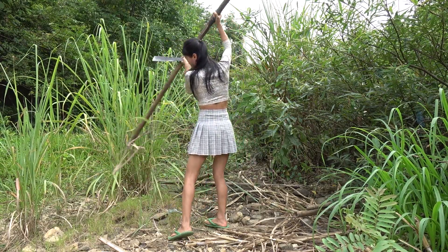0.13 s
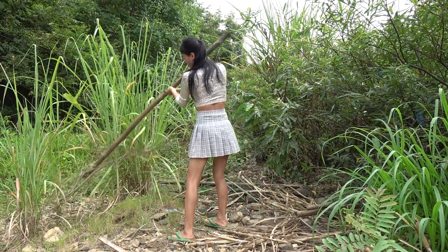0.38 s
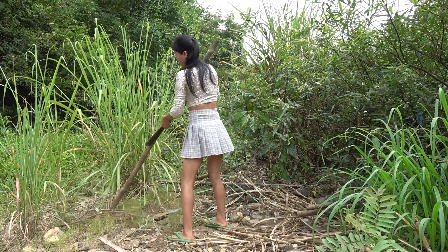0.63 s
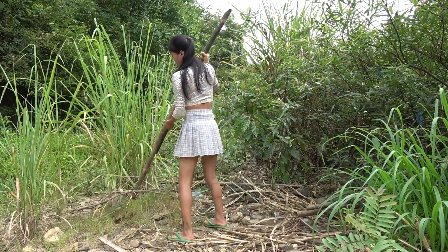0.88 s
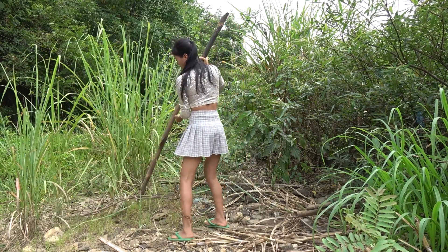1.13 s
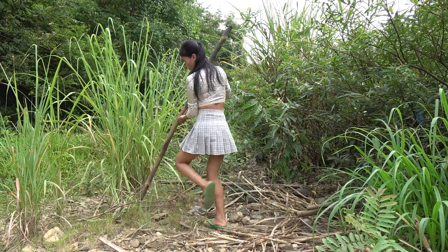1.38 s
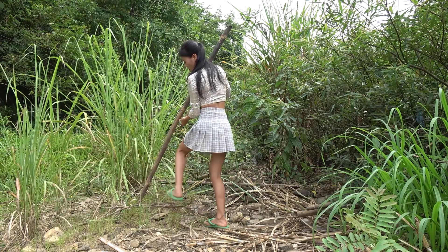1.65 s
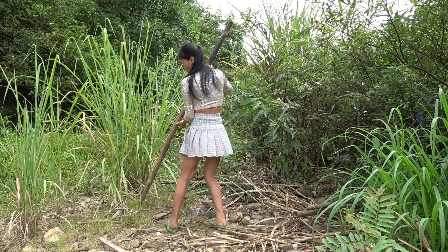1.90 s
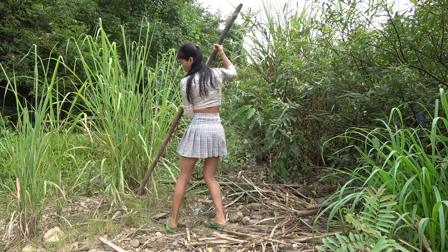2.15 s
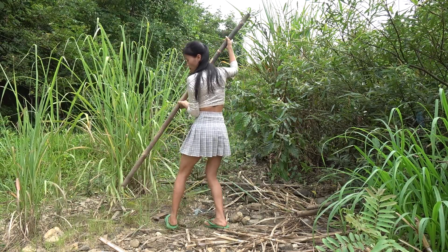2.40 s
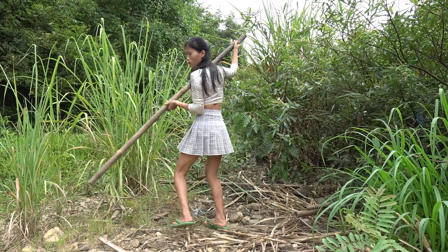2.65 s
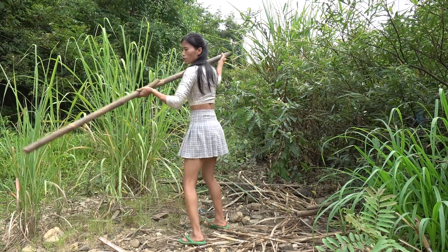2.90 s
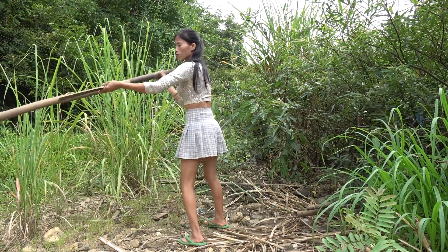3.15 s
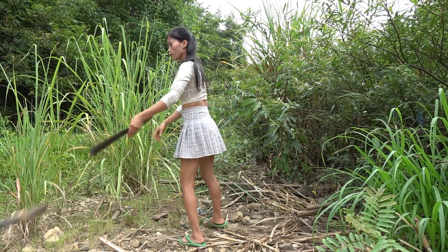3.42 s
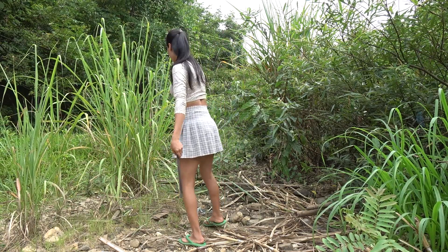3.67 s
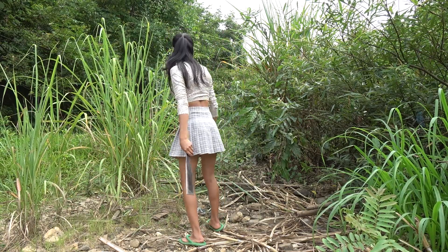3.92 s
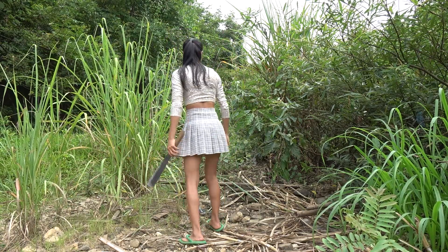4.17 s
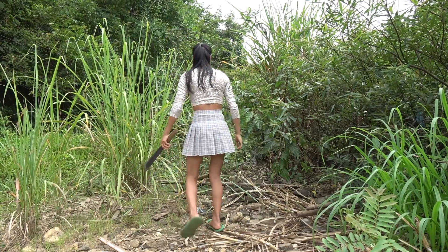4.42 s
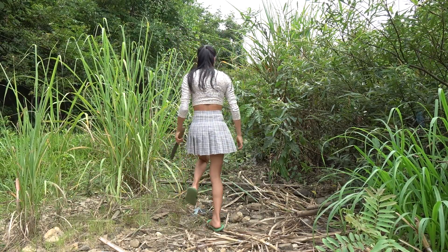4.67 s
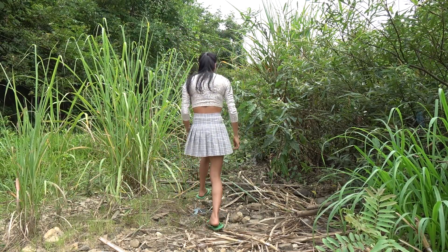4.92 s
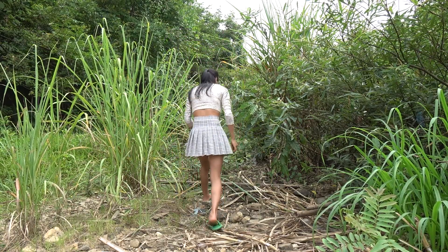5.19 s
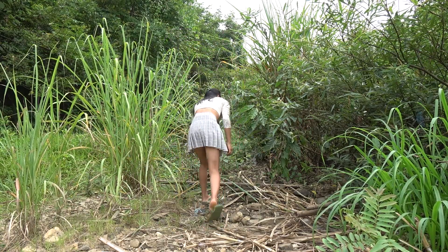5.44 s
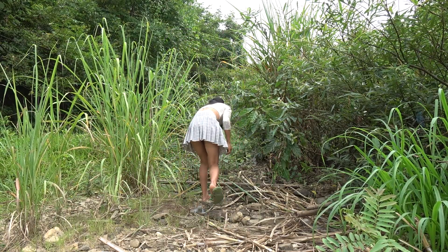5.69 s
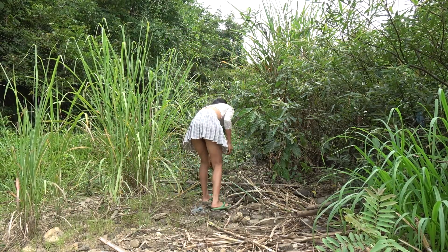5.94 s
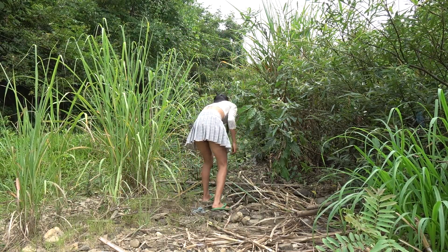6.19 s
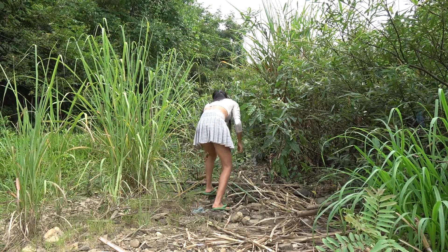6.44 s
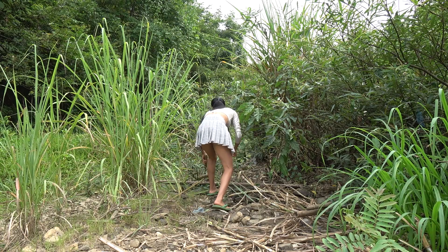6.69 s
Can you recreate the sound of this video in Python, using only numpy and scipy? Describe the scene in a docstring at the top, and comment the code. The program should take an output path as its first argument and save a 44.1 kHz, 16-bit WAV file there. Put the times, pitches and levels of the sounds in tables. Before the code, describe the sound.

A long wooden pole swishes through dry brush, then clatters hollowly onto a pile of sticks at left, over steady high cicada trill outdoors.

```python
"""Dry open-air brush: a long bamboo pole is dragged through it, knocked about and thrown on a pile of
sticks to the left; feet then crunch over dry stalks. Knocks and taps are fading tones with noise; the rustle
is random grains and hiss, snaps are short noise ticks, and a low noise burst is the pole's thud.
Cicadas are clicks in one high throbbing band; a cricket's pulsed tone chirps below them.
A far engine mutters as a few low tones under the noise of the open air."""
import sys
import numpy as np
from scipy import signal
from scipy.io import wavfile

SR = 44100
rng = np.random.default_rng(int(sys.argv[2]) if len(sys.argv) > 2 else 0)


def level_to_linear(level):
    """Convert decibel levels to linear amplitude factors, elementwise."""
    exponent = np.asarray(level, float) / 20
    return 10 ** exponent


def materialize(psi):
    """Save the field psi as 16-bit PCM at rate SR to the path in sys.argv[1].

    A 1-D psi becomes a single channel; in a 2-D psi each row is a channel.
    """
    bounded = np.clip(np.atleast_2d(psi).T, -1, 1)
    quanta = np.round(bounded * 32767).astype(np.int16)
    wavfile.write(sys.argv[1], SR, quanta)


N = 300762   # length in samples

# throbbing cicadas over time: [t/s, level/dB, usual throb rate/Hz, throb depth 0-1]
CICADAS = [(0, -37.5, 26.3, 0.08), (3.5, -37.5, 25, 0.27), (6.82, -38, 22, 0.06)]
# resonances of the cicadas: [f/Hz, width/Hz, relative level/dB]
CICADA_MODES = [(6432, 390, 1.5), (6660, 280, 5.5), (7115, 47, -3)]
# far engine over time: [t/s, usual firing rate/Hz, level/dB]
ENGINE = [(0, 19.3, -55), (6.82, 17.7, -63)]
# engine tones: [multiple of the firing rate, usual relative level/dB]
ENGINE_ORDERS = [(3, -4), (4, 0.1), (5, -1.5)]
# tone colour of the open air: [f/Hz, relative level per Hz/dB]
AIR = [(25, -13), (80, -3), (330, -9), (750, -4.5), (1500, -10), (4000, -18), (8000, -20), (16000, -20.5)]
# how alike the air sounds at left and right: [f/Hz, likeness 0-1]
LIKENESS = [(60, 0.88), (1000, 0.9), (4000, 1), (12000, 0.29)]
# where the wood is: [t/s, left minus right level/dB]
WOOD_SIDE = [(0, 2), (3.3, 1.5), (3.5, 7), (3.66, 12.5), (4.8, 12), (5.1, 1.5)]
# the pole or a foot goes through leaves and stalks, both times for a 20 dB change:
# [t of the peak/s, level at the peak/dB, swell time/s, fade time/s]
BRUSHES = [(0.669, -27.5, 0.59, 0.41), (1.32, -38.5, 0.38, 0.28), (1.898, -28, 0.078, 0.19),
           (2.299, -34.5, 0.17, 0.021), (2.51, -43.5, 0.25, 0.15), (2.87, -39.5, 0.088, 0.4),
           (3.69, -30, 0.06, 0.093), (3.758, -26.5, 0.11, 0.079), (3.94, -32.5, 0.073, 0.16),
           (4.45, -40.5, 0.15, 0.38), (4.689, -28.5, 0.027, 0.031), (5.22, -35, 0.015, 0.038),
           (5.85, -29.5, 0.15, 0.072), (5.937, -26.5, 0.026, 0.085), (6.27, -48.5, 0.17, 0.81),
           (6.64, -40, 0.069, 0.11)]
# dry stalks and leaves snapping: [t/s, relative level/dB]
SNAPS = [(0.7454, -21), (1.81, -26), (2.056, -6), (2.1873, -17.5), (2.222, -25.5), (3.2338, -16.5),
         (3.55, -13), (3.587, -15), (3.6634, -9), (3.704, -4), (3.752, -12), (3.8507, -16), (4.001, -14.5),
         (4.347, -28), (4.408, -24), (4.633, -17), (4.666, -12), (5.2143, -20), (6.534, -25.5)]
# soft footfalls and light taps on sticks lying on soil: [t/s, level/dB, pitch f/Hz]
TAPS = [(.748, -24, 720), (1.6, -33, 406), (2.917, -24, 646), (4.808, -54, 730), (5.271, -32.5, 530),
        (5.365, -30, 559), (5.971, -35, 298), (6.032, -35, 292), (6.181, -31.5, 615), (6.301, -36, 300),
        (6.628, -27, 510)]
# wood on wood: [t/s, relative level/dB, loudest pitch f/Hz, crunch re blow level/dB, tick re blow level/dB]
KNOCKS = [(1.121, -13, 727, -22.5, -10), (1.894, -32, 590, 7, 5), (1.968, -25.5, 780, -0.5, -20),
          (2.01, -17, 1376, -22, -11), (2.08, -23, 564, -28, -9.5), (2.169, -20, 1301, -40, -14),
          (3.108, -24.5, 526, -12, -12), (3.492, -3.5, 1330, -9, -12), (3.507, -4.5, 725, -10.5, -36),
          (3.551, 0.5, 1547, -18, -15.5), (3.598, -5.5, 918, -22, -31), (3.608, -6.5, 718, -16, -45),
          (3.655, -5.5, 1302, -7.5, -15.5), (3.684, -5.5, 1285, -17, -13), (3.703, -11.5, 685, 5.5, -11),
          (3.734, -9.5, 1217, -18, -8.5), (3.768, -10.5, 332, -12.5, -8.5), (3.797, 1, 1314, -27, -51),
          (3.855, -2, 1287, -28, -21), (3.873, -1, 1318, -21.5, -53), (3.926, -15.5, 738, -13, -2),
          (3.94, -12.5, 682, 4.5, -4.5), (4.026, -7, 961, -14.5, -30), (4.036, -5, 1192, -18, -19),
          (4.042, -6.5, 967, -27, -47), (4.128, -21.5, 430, 5, -1), (4.333, -15.5, 1330, -2, -34),
          (4.345, -10.5, 410, -1.5, -12), (4.384, -15.5, 800, -7, -13), (4.42, -6, 1150, -8, -17.5),
          (4.432, -9, 765, -8.5, -16), (4.546, -25.5, 675, 7.5, -22), (4.629, -5.5, 1466, -10, -31),
          (4.642, -6, 854, -3, -14.5), (4.776, -25.5, 646, -19, -27), (5.75, -11, 1030, -1.5, 0.5),
          (5.762, -3, 688, -16.5, -44), (5.789, -11, 577, -11, -10)]
# ringing modes of the hollow wood: [usual f/Hz, relative level/dB, time to die by 60 dB/s]
WOOD = [(171, -9.5, 0.96), (332, -1.5, 0.44), (506.4, 1.5, 0.32), (590, -1.5, 0.15), (727, 1, 0.37),
        (783, -7.5, 0.73), (958, -1.5, 0.19), (1168, -0.5, 0.14), (1301, 0, 0.11), (1624, -7, 0.1),
        (2010, -4.5, 0.086)]
# the pole's full weight meets the soil: [t/s, level of the push before filtering/dB, time to die by 60 dB/s]
THUD = (3.54, -3, 0.39)

CRICKET_DB = -62   # usual level, it wavers
STIR_DB = -58   # leaves never quite still
TAP_CYCLES = 20.2   # a tap dies by 60 dB in this many cycles
CLACK_DB, CLACK_T60_S = 4.5, 0.013   # at first contact many modes speak loudly and briefly
RING_SWELL_S = 0.006   # the lasting ring builds while the contact lasts
# The wood rings freely until the next blow, at most this long and less when it crunches, then is damped.
FREE_RING_S, DAMPED_T60_S = 0.09, 0.13


def rms_one(x):
    """Scale to an average (rms) strength of 1."""
    return x / np.sqrt(np.mean(x ** 2) + 1e-20)


def in_time(rows):
    """Join a table's points with straight lines, giving each column one value per sample."""
    s, *columns = np.transpose(rows)
    return [np.interp(np.arange(N) / SR, s, column) for column in columns]


def drift(rate_hz):
    """Random wandering with spread 1, faster for a higher rate."""
    # worked out at every 40th sample only; the first 2000 values let the filter settle
    r = np.exp(-80 * np.pi * rate_hz / SR)
    white = rng.standard_normal(N // 40 + 2002)
    slow = signal.lfilter([1], [1, -2 * r, r * r], white)[2000:]
    return np.interp(np.arange(N) / 40, np.arange(len(slow)), rms_one(slow))


def band(x, low_hz, high_hz):
    """Keep the pitches between two limits (Butterworth band-pass)."""
    edges = [low_hz, min(high_hz, 0.45 * SR)]
    return signal.sosfilt(signal.butter(2, edges, "band", fs=SR, output="sos"), x)


def fade(clicks, t60):
    """An envelope that jumps at each click and dies by 60 dB in t60 seconds."""
    return signal.lfilter([1], [1, -level_to_linear(-60 / (t60 * SR))], clicks + 1e-18)


def grains(per_s, spread_db):
    """Random clicks of random sign, a few much larger than the rest."""
    sizes = level_to_linear(spread_db * np.minimum(rng.exponential(1, N), 5))
    signs = rng.choice([-1, 1], N)
    return sizes * signs * (rng.random(N) < per_s / SR)


def pan(left_db):
    """Left and right gains for a level difference."""
    return level_to_linear(np.multiply.outer([0.5, -0.5], left_db))


def wood_side_db(t):
    """How much louder the wood is at the left at time t."""
    return np.interp(t, *np.transpose(WOOD_SIDE))


def cicadas():
    """A crowd of buckling tymbals: fast clicks into their resonances, throbbing together."""
    level_db, throb_hz, depth = in_time(CICADAS)
    turns = np.cumsum(throb_hz * (1 + 0.05 * drift(1.0))) / SR
    throb = 1 + np.clip(depth, 0, 1) * np.cos(2 * np.pi * turns)
    shared = grains(3000, spread_db=0.5)
    # each ear also gets clicks of its own
    clicks = np.array([shared + 0.59 * grains(3000, spread_db=2.5) for ear in range(2)])
    song = 0
    for hz, width_hz, db in CICADA_MODES:
        song = song + level_to_linear(db) * rms_one(band(clicks, hz - width_hz / 2, hz + width_hz / 2))
    return rms_one(song * throb) * level_to_linear(level_db) * pan([2.2])


def cricket():
    """Chirps of two wing strokes, each a slightly rough tone swelling over a faint steady one."""
    chirp = np.cumsum(20.0 * (1 + 0.1 * drift(3))) / SR % 1   # place within a chirp, about 20 a second
    strokes = 0.35 + np.sin(np.pi * 3 * chirp) ** 2 * (chirp < 2 / 3)
    pitch_hz = 4680 * (1 + 0.009 * drift(150))
    tone = np.sin(2 * np.pi * np.cumsum(pitch_hz) / SR)
    return rms_one(tone * strokes) * level_to_linear(CRICKET_DB + 1.5 * drift(3)) * pan([1.2])


def engine():
    """Low multiples of the firing rate, each wavering on its way through the air."""
    rate_hz, level_db = in_time(ENGINE)
    phase = 2 * np.pi * np.cumsum(rate_hz * (1 + 0.02 * drift(2))) / SR
    tones = sum(level_to_linear(db + 2.13 * drift(3.6)) * np.sin(k * phase) for k, db in ENGINE_ORDERS)
    return level_to_linear(level_db) * tones


def air():
    """Far wind and distance hiss in half-octave bands, each flickering a little."""
    out, together = 0, drift(1.5)
    edges = 25 * 2 ** np.arange(0, 9.6, 0.5)
    white = rng.standard_normal((2, 2, N))   # neighbouring bands use different noise
    air_hz, air_db = np.transpose(AIR)
    alike_hz, alike_share = np.transpose(LIKENESS)
    for k, (low, high) in enumerate(zip(edges, edges[1:])):
        mid, side = band(white[k % 2], low, high)
        at = np.log(low * high) / 2   # middle of the band on a log scale
        alike = np.clip(np.interp(at, np.log(alike_hz), alike_share), 0, 1)
        level_db = np.interp(at, np.log(air_hz), air_db)
        gain = level_to_linear(level_db + 0.6 * together + 1.6 * drift(27))
        # the shared part goes equally to both ears, the rest with opposite signs
        out = out + gain * (np.sqrt(1 + alike) * mid + np.sqrt(1 - alike) * side * [[1], [-1]])
    return rms_one(out) * level_to_linear(-47.5) * pan([1.8])


def brushing():
    """Each stroke swells steadily in dB to its peak and fades again; overlapping strokes add in power."""
    t, power = np.arange(N) / SR, level_to_linear(2 * STIR_DB)
    for s, db, swell_s, fade_s in BRUSHES:
        drop_db = 20 * np.maximum((s - t) / swell_s, (t - s) / fade_s)
        power = power + level_to_linear(2 * (db - drop_db))
    return np.sqrt(power)


def far_off(x):
    """The pile lies further away than the brush: the further left, the duller the top."""
    dull = signal.sosfilt(signal.butter(2, 9000, fs=SR, output="sos"), x)
    share = np.clip(in_time(WOOD_SIDE)[0] / 11, 0, 1)
    return share * dull + (1 - share) * x


def rustle():
    """Dense brittle grains on hiss, with a duller share from the thicker stalks."""
    brittle = rms_one(grains(2500 * level_to_linear(1.2 * drift(35)), spread_db=6.5))
    source = brittle + 4.0 * rng.standard_normal(N)
    source = source + 0.84 * rng.standard_normal((2, N))   # scattered by the brush, unlike at each ear
    bright = rms_one(band(source, 5510, 12000))
    dull = level_to_linear(-5.5) * rms_one(band(source, 2760, 6880))
    dull = dull + level_to_linear(-16.0) * rms_one(band(source, 540, 1270))
    cracks = fade(grains(90, spread_db=2.2) ** 2, 0.03)   # single stalks cracking
    crackle = level_to_linear(-12) * rms_one(band(cracks * source, 2000, 15000))
    strength = brushing() * level_to_linear(2.0 * drift(24))
    return far_off((bright + dull + crackle) * strength * pan(1.03 * in_time(WOOD_SIDE)[0]))


def snaps():
    """A stalk breaks: a broad tick with a short gritty tail."""
    s, db = np.transpose(SNAPS)
    hits = np.zeros(N)
    hits[(s * SR).astype(int)] = level_to_linear(db - 3.0)
    envelope = fade(hits, 0.014) + level_to_linear(-13) * fade(hits, 0.09)
    noise = band(rng.standard_normal(N), 4200, 15000)
    return far_off(pan(0.6 * in_time(WOOD_SIDE)[0]) * noise * envelope)


def taps():
    """A short dull tone with a puff of grit, dying faster when the pitch is higher."""
    out, t = np.zeros((2, N + SR)), np.arange(SR // 8) / SR
    for s, db, hz in TAPS:
        puff = rms_one(band(rng.standard_normal(len(t)), hz / 2, 3.1 * hz))
        tone = np.sin(2 * np.pi * hz * t) + 0.71 * puff
        envelope = level_to_linear(db - 60 * t * hz / TAP_CYCLES) * np.minimum(t * hz / 2, 1)   # rises over two cycles
        i = int(s * SR)
        out[:, i:i + len(t)] += pan([wood_side_db(s)]) * tone * envelope
    return out[:, :N]


def ringing(t, pitch_hz, crunch_db, gap_s, turn, luck):
    """The wood's modes after one blow: a brief clack and a lasting ring, damped when it touches down."""
    hz, mode_db, t60 = np.transpose(WOOD)[..., None]
    octaves = np.abs(np.log2(hz / pitch_hz))
    # each blow's modes are randomly detuned a little; the nearest takes the blow's own pitch
    tuned_hz = np.where(octaves == octaves.min(), pitch_hz, hz * (1 + 0.064 * (turn - 0.5)))
    octaves = np.abs(np.log2(tuned_hz / pitch_hz))
    others = octaves > 0
    # a clean tap picks out one mode, a crunching blow wakes them all
    favour_db = 0.45 * min(crunch_db, 0) * np.minimum(octaves / 0.072, 1)
    favour_db = favour_db - (3.07 + 4.2 * (tuned_hz < pitch_hz)) * octaves + 7 * others * (luck - 0.5)
    ring = level_to_linear(favour_db - 60 * t / t60) * np.minimum(t / RING_SWELL_S, 1)
    clack = level_to_linear(CLACK_DB - 7.9 * octaves + 4.7 * luck - 60 * t / CLACK_T60_S)
    waves = np.sin(2 * np.pi * (tuned_hz * t + 0.43 * turn))
    modes = level_to_linear(mode_db * others) * (ring + clack) * waves
    free_s = min(gap_s, FREE_RING_S * np.clip(-crunch_db / 26, 0, 1))
    damping = level_to_linear(-60 * np.maximum(t - free_s, 0) / DAMPED_T60_S)
    return modes.sum(axis=0) * damping * np.minimum(t / 0.0016, 1)


def knocks():
    """A blow sets the wood ringing, most near one pitch, until it touches down; the pile crunches with it."""
    out, span = np.zeros((2, N)), SR // 4
    t, noise = np.arange(span) / SR, grains(2500, spread_db=3.0)
    chance = rng.random((len(KNOCKS), 2, len(WOOD), 1))
    gaps = np.diff([row[0] for row in KNOCKS], append=N / SR)
    for (s, db, pitch_hz, crunch_db, tick_db), gap_s, (turn, luck) in zip(KNOCKS, gaps, chance):
        i = int(s * SR)
        ring = ringing(t, pitch_hz, crunch_db, gap_s, turn, luck)
        crackle = noise[i - span:i]   # any stretch of the grains will do
        crunch = rms_one(band(crackle, pitch_hz / 1.55, pitch_hz * 1.8))
        crunch = crunch * (level_to_linear(-60 * t / 0.079) + level_to_linear(-15.0 - 60 * t / 0.5)) * np.minimum(t / 0.034, 1)
        grit = rms_one(band(crackle, 610, 5100)) * level_to_linear(-5.5 - 60 * t / 0.15)
        tick = rms_one(band(rng.standard_normal(span), 780, 2000))
        tick = tick * level_to_linear(-60 * t / 0.034) * np.minimum(t / 0.0023, 1)
        blow = level_to_linear(db - 8.5) * ring + level_to_linear(db + crunch_db) * crunch + level_to_linear(db + tick_db) * (tick + grit)
        out[:, i:i + span] += pan([wood_side_db(s)]) * blow[:N - i]
    return band(out, 80, 12000)


def thud():
    """Soft soil swallows all but the lowest push."""
    s, db, t60 = THUD
    push = rng.standard_normal(N) * fade(np.arange(N) == int(s * SR), t60)
    low = band(band(push, 65, 160), 65, 160)   # twice, for steeper edges
    return low * level_to_linear(db) * pan([4.0])


def scene():
    """Wood and brush near by, insects all round, engine and air far off."""
    far = cicadas() + cricket() + engine() + air()
    return far + rustle() + snaps() + taps() + knocks() + thud()


def band_limit(x):
    """A steep low-pass at the top of the band."""
    return signal.sosfilt(signal.butter(12, 16000, fs=SR, output="sos"), x)


def record(dry):
    """The loudest peaks are rounded off."""
    mix = 0.83 * np.tanh(dry / 0.92)
    return band_limit(mix)


dry = scene()
out = record(dry)
materialize(out)
```